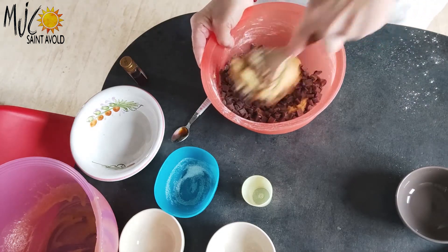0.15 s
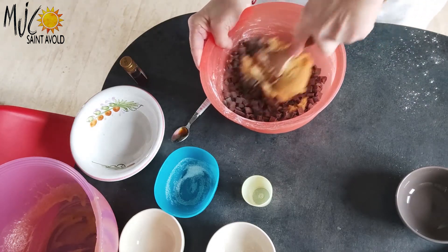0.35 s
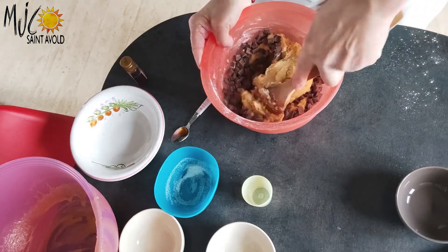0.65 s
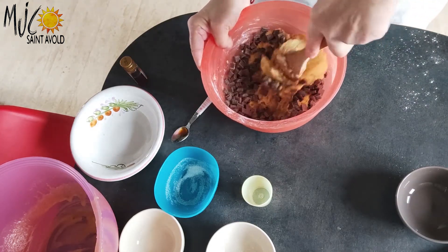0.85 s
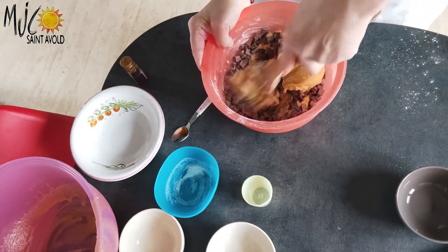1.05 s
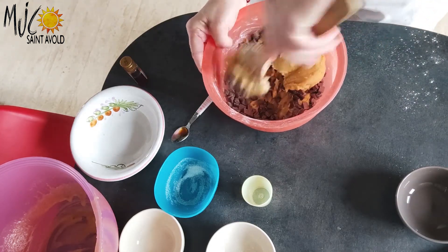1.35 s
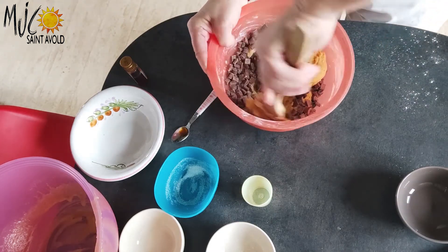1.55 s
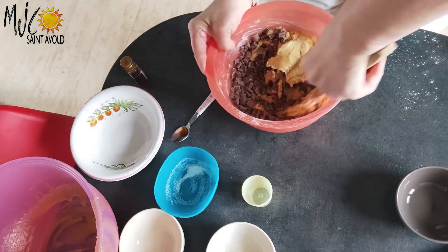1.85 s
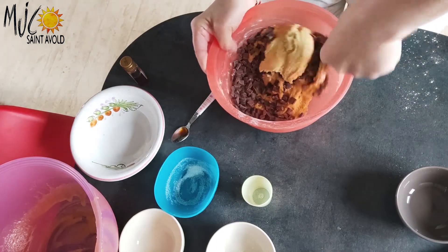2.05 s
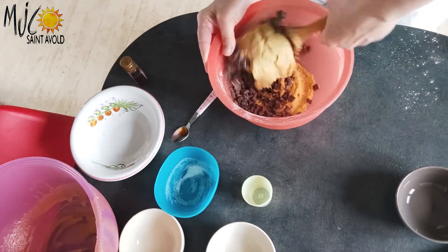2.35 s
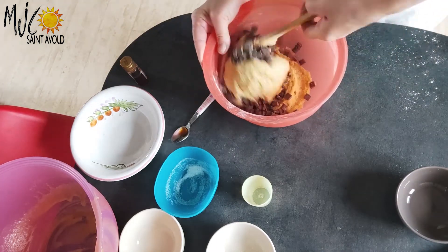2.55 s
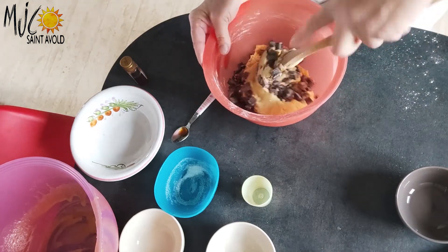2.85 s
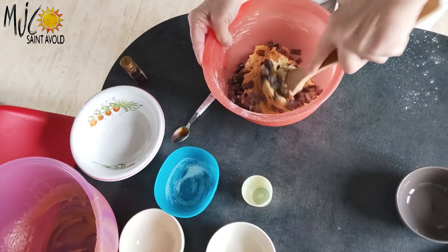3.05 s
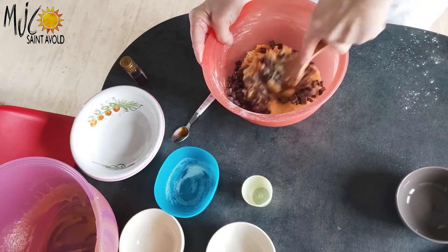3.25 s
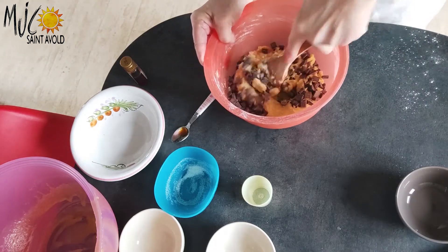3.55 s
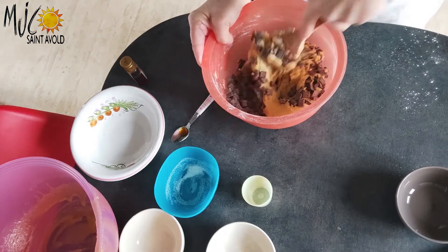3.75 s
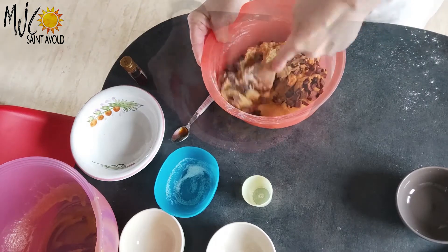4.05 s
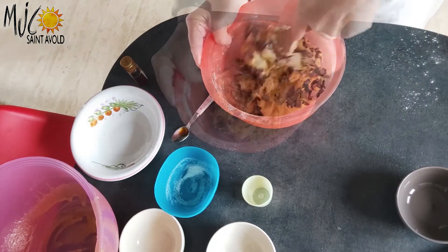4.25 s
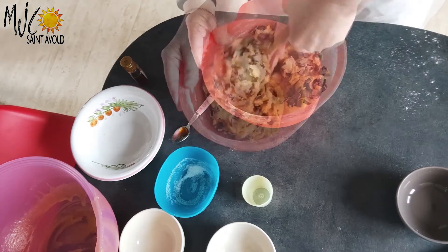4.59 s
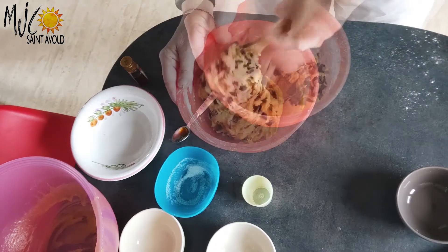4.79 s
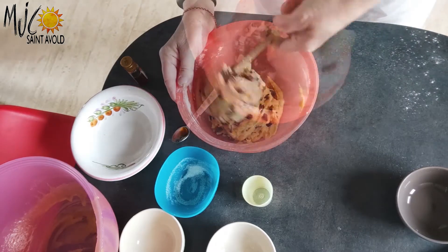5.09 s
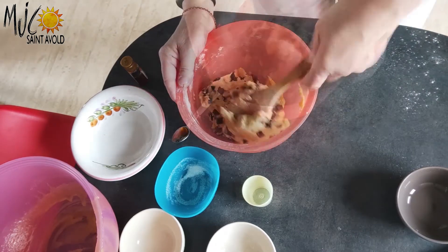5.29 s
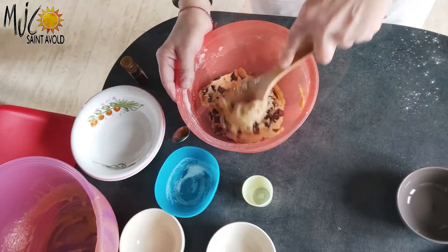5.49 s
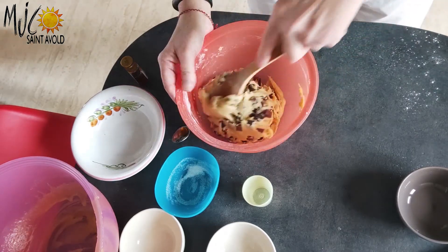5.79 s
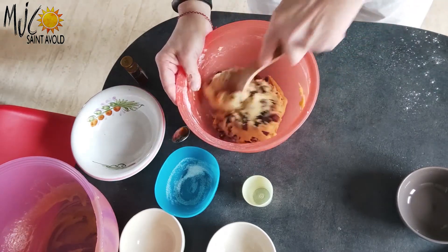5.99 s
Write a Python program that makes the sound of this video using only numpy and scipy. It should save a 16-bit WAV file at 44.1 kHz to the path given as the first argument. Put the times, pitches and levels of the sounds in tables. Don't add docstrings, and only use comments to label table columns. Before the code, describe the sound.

Loose chips spill and click against the wall of a plastic bowl while a spoon drags through heavy dough, heard close in stereo with a short kitchen echo. Bursts of snaps alternate with scraping sweeps and dull bowl thuds, the hardest knock past the middle. Then the chips suddenly vanish, leaving soft, sticky peeling, small pops and a couple of faint knocks over low hum and air.

```python
import sys
import numpy as np
from scipy import signal
from scipy.fft import rfft, irfft, next_fast_len
from scipy.io import wavfile

SR = 44100
rng = np.random.default_rng(int(sys.argv[2]) if len(sys.argv) > 2 else 0)


def attenuation_scalar(level_db):
    decades = np.asarray(level_db, float) / 20
    return 10 ** decades


def generate_wav(sig):
    pcm = np.round(np.clip(np.atleast_2d(sig).T, -1, 1) * 32767).astype(np.int16)
    wavfile.write(sys.argv[1], SR, pcm)


N = 270288
CHANGE_S = 4.733

# (time [s], rattle [dB], brightness [dB], body [dB], time to fade 20 dB [s])
SPILLS = [(0.0, -33.5, -6, -12.5, 0.14), (0.202, -39.5, -16.5, -14.5, .05), (0.685, -42, -0.5, -7, 0.19),
          (1.128, -36.5, 0, -6, 0.09), (1.485, -37, -3, -4.5, 0.11), (1.688, -41.5, -5, -15.5, 0.42),
          (2.309, -45, -3.5, -10, 0.8), (2.921, -44.5, -6, -9.5, 0.2), (2.988, -32, -16, -19, .17),
          (3.427, -52.5, 2, 14, 0.03), (3.477, -42, -7, -13, 0), (3.74, -50, -5.5, 0.5, 0.27),
          (3.987, -37, -3.5, -6, .22), (4.345, -40.5, -16, -6, .07), (4.476, -36, -2, -5.5, .3)]
# (peak time [s], rattle [dB], brightness [dB], body [dB], time to fade 20 dB [s])
SWEEPS = [(0.302, -46, 4.5, 2, .1), (0.469, -41, -6, -11.5, 0.25), (0.858, -50.5, -1, -4.5, 0.23),
          (1.3, -63, 9, 1, .5), (1.58, -49.5, 2, -8, 0.28), (1.84, -47.5, -4.5, -8.5, 0.27),
          (1.96, -49.5, 0.5, -2.5, 0.22), (2.07, -47, -1, 1, .15), (2.19, -57, 5, -7, 0.74),
          (2.4, -41, -3, -15, 0.41), (2.58, -51, -1, -1.5, 0.4), (2.74, -38, -6, -12.5, 0.1),
          (3.18, -49.5, -8.5, -6, 0.54), (3.598, -44, -2.5, -4, 0.15), (3.85, -67, 3.5, -4, 0.1),
          (4.14, -48, 9, -5, 0.06), (4.238, -38.5, -2, -8.5, 0.1), (4.65, -51.5, 0, -5, 0.23)]
# (peak time [s], rattle [dB], brightness [dB], body [dB], time to fade 20 dB [s])
PEELS = [(4.76, -63, -1.5, -5.5, 0.21), (4.87, -75, 10, -19, 0.074), (4.983, -71, 22, -4, 0.07),
         (5.282, -61.5, 10.5, -11, 0.22), (5.4, -64, 8.5, -4.5, 0.11), (5.48, -66, 12, -6, .07),
         (5.6, -87.5, 18, -4.5, 0.29), (5.7, -71, -7.5, -19, .06), (5.8, -99, 15, 2, .3),
         (5.955, -62, -3, -1.5, .1), (6.12, -76, 21.5, -5, 0.23)]
# (peak time [s], rumble [dB], upper modes [dB], time to fade 20 dB [s])
SHOVES = [(0.0, -58.5, 5.5, 0.32), (0.36, -48, -3, 0.15), (0.5, -57.5, 0.5, 0.4), (0.87, -57.5, 2, 0.25),
          (1.35, -67, 4.5, .3), (1.72, -58.5, 3.5, 0.36), (1.96, -59.5, 2.5, 0.44), (2.2, -70, 8, 0.95),
          (2.8, -65.5, 6.5, 0.43), (3.05, -60.5, 4.5, .35), (3.36, -59, 3, -0.05), (3.62, -53, 0.5, 0.19),
          (3.72, -63, -3, .1), (4.08, -45.5, -0.5, 0.12), (4.17, -51, 2, 0.13), (4.26, -56.5, 3, .12),
          (4.558, -45, 0, 0.11), (4.725, -51, -1, 0.04), (5.3, -74, 3, 0.2), (5.62, -73.5, 0, .4),
          (5.97, -72, 4, .3)]
# (time [s], rumble [dB], upper modes [dB], time to fade 20 dB [s])
JOLTS = [
    (0.3, -47.5, 3, 0.19),
    (0.705, -44.5, 1.9, 0.12),
    (1.136, -48.5, 1.3, 0.16),
    (2.436, -47.5, 1.3, 0.13),
    (3.428, -40.5, 7.6, 0.14),
    (3.851, -46, 2.6, 0.12),
    (4.343, -40.5, 1.9, .13),
    (4.812, -51.5, 0, .14),
    (5.848, -64, 9, .03),
]
# (time [s], peak [dB], treble [dB], shower [dB])
SNAPS = [(0.0094, -18.5, -11.5, -28), (0.0573, -20.5, -1.5, -26), (0.1411, -22, -11, -26),
         (0.2024, -23.5, -6.5, -23), (0.4015, -17.5, -10, -25), (0.4289, -21, -4.5, -36),
         (0.6833, -13, -10, -20), (0.7028, -16, -8.5, -28), (1.1273, -31, -3.5, -3), (1.1308, -21, -9, -24),
         (1.4815, -15, -9.5, -28), (1.4858, -17, -5, -18.5), (1.6886, -26, -17, -18.5),
         (2.362, -24.5, -21, -13), (2.4578, -18, -14, -24), (2.5042, -18.5, -10, -26.5),
         (2.574, -11, -11.5, -25), (2.6329, -13, -13.5, -35), (2.7038, -16.5, -9.5, -30),
         (2.7646, -16.5, -3.5, -28), (2.9208, -27, -8.5, -4.5), (2.9856, -17.5, -21, -24),
         (3.0026, -17, -10, -59), (3.475, -16.5, -8, -35), (3.9913, -17.5, -15, -40),
         (3.9968, -19, -10, -40), (4.4408, -19.5, -10, -31), (4.4757, -12, -7, -23.5),
         (4.6324, -17, -14.5, -24), (4.7157, -14, -16, -46)]
# (time [s], peak [dB], treble [dB])
TICKS = [(0.035, -27.5, -5), (0.2755, -31, 0.5), (0.2994, -27.5, -8), (0.4751, -20, -0.5),
         (0.4956, -28, 2.5), (0.6122, -31.5, -1.5), (1.0923, -30.5, -18), (1.12, -26.5, -2.5),
         (1.246, -28, -16), (1.3225, -39.5, 2), (1.779, -26, -12), (1.8407, -23.5, -22),
         (1.934, -31.5, -35.5), (2.3097, -32.5, -12), (2.4046, -27, -2), (2.513, -21.5, -15.5),
         (2.5348, -19.5, -9.5), (2.6196, -20.5, -17), (2.6792, -29, -25.5), (3.088, -19, -29),
         (3.149, -22.5, -11), (3.1729, -27.5, -9.5), (3.2008, -28, -8), (3.2202, -22.5, -6.5),
         (3.2608, -23, -17), (3.3532, -28.5, -10), (3.5639, -21.5, -12), (3.5866, -24, -8.5),
         (3.706, -38, -1.5), (3.7388, -24.5, -13.5),
         (0.395, -25, -7), (0.5543, -30.5, -26), (0.6045, -37, -1), (0.8579, -40, 6), (1.062, -45.5, 4),
        (1.3838, -41, -3), (2.3487, -36, -16), (2.723, -28, -4), (3.4073, -33, -13), (3.835, -40, 5),
        (3.93, -47.5, 1.5), (4.226, -29.5, -4), (3.8173, -27.5, -16), (4.011, -21.5, -6),
        (4.0505, -21.5, -4), (4.113, -28.5, 0), (4.2328, -22, -6.5), (4.506, -26.5, -10),
        (4.5212, -26, -12), (4.5496, -23, -14), (4.5814, -24, -5), (4.6922, -21, -2.5),
        (4.8679, -42.5, 5.5), (5.209, -65.5, -4.5), (5.7202, -55, 7), (5.785, -62, 9.5), (5.892, -60, 10),
        (5.95, -51.5, 2), (6.049, -53, 7.5)]
# (time [s], peak [dB], hardness [dB], table thud [dB])
KNOCKS = [(0.299, -34.5, -2, -31), (0.339, -30.5, -31, -22), (0.704, -33.5, -7.5, -14),
          (1.129, -41.5, 4, -18), (1.95, -45, 4, -14.5), (2.436, -40, -35, -27), (3.426, -19, -9.5, -28.5),
          (3.619, -45, -12.5, -23), (3.852, -45, -12, -5), (4.34, -25, -30, -24), (4.799, -44, -30, -14),
          (5.843, -55, -31, -18.5)]
# (frequency [Hz], width [Hz], level [dB])
BOWL_MODES = [(167, 28.3, -7), (227.8, 13.7, -3), (318, 29, -10.5), (360, 24.3, -6), (436, 45, -3.5),
              (503, 47, -7.5), (637, 55, -0.5), (795, 71, -4), (977, 66, -11), (1140, 74, -10.5)]
# (frequency [Hz], width [Hz], level [dB])
WALL_MODES = [(955, 220, 2), (1310, 126, 8), (1730, 220, 3), (2200, 250, -10)]
# (frequency [Hz], width [Hz])
TABLE_MODE = (69.4, 22.6)
# (frequency [Hz], density [dB per Hz])
CHIP_COLOUR = [(400, -25), (750, -15), (1200, -9), (1600, -13), (2100, -7.5), (2600, -4), (3200, -10),
               (4200, -15), (5900, -14.5), (7250, -4.5), (8900, -10), (9900, -32.5), (11500, -39),
               (15000, -42)]
# (frequency [Hz], density [dB per Hz])
AIR_COLOUR = [(25, -4), (40, -10.5), (70, -10.5), (200, -11.5), (500, -16.5), (1000, -25.5), (3000, -27),
              (5500, -33), (7300, -17.5), (8700, -20), (9900, -33.5), (12000, -31), (15000, -39)]
# (frequency [Hz], difference [dB])
PORT_DIFFERENCE = [(100, 5), (620, 5), (1350, 0.5), (2400, -0.5), (4300, -0.5), (5600, -8.5), (6600, -5),
                   (7400, -11), (8300, 5), (9500, 8), (12000, -1)]
# (frequency [Hz], time to fade 60 dB [s])
ROOM_T60 = [(100, 0.39), (1000, 0.33), (4000, 0.36), (9000, 0.23)]


def rms_one(x):
    return x / np.sqrt(np.mean(x ** 2) + 1e-20)


def at_hz(points, hz):
    table_hz, values = np.array(points).T
    return np.interp(np.log(hz + 1), np.log(table_hz), values)


def colour(x, points, share=1):
    size = next_fast_len(N + 8192)
    level_db = share * at_hz(points, np.fft.rfftfreq(size, 1 / SR))
    cepstrum = irfft(level_db * np.log(10) / 20, size)
    cepstrum = np.r_[cepstrum[0], 2 * cepstrum[1:size // 2]]
    return irfft(rfft(x, size) * np.exp(rfft(cepstrum, size)), size)[..., :N]


def drift(rate):
    r = np.exp(-80 * np.pi * rate / SR)
    slow = signal.lfilter([1], [1, -2 * r, r * r], rng.standard_normal(N // 40 + 2002))[2000:]
    return np.interp(np.arange(N) / 40, np.arange(len(slow)), rms_one(slow))


def ring(x, hz, width_hz):
    r, w = np.exp(-np.pi * width_hz / SR), 2 * np.pi * hz / SR
    return signal.lfilter([0, np.sin(w)], [1, -2 * r * np.cos(w), r * r], x + 1e-18)


def three_bands(x):
    low_hz, high_hz = 1850, 4500
    kinds = [(low_hz, "low"), ((low_hz, high_hz), "band"), (high_hz, "high")]
    return [signal.sosfilt(signal.butter(3, hz, kind, fs=SR, output="sos"), x) for hz, kind in kinds]


def grains(per_s, spread_db, clump_db):
    sizes = attenuation_scalar(spread_db * np.minimum(rng.exponential(1, N), 5)) * rng.choice([-1, 1], N)
    struck = rng.random(N) < per_s * attenuation_scalar(clump_db * drift(25)) / SR
    return rms_one(sizes * struck)


def swells(s, db, rise_s, fade_s):
    age = np.arange(0, N + 32, 32) / SR - s[:, None]
    shape_db = -20 * np.maximum(age / fade_s[:, None], -age / rise_s[:, None])
    power = np.sum(attenuation_scalar(2 * (db[:, None] + shape_db)), axis=0)
    return np.interp(np.arange(N) / 32, np.arange(len(power)), 10 * np.log10(power + 1e-14))


def stirring():
    s, db, bright_db, body_db, fade_s = np.transpose(SPILLS + SWEEPS + PEELS)
    is_spill = np.arange(len(s)) < len(SPILLS)
    rise_s = np.where(is_spill, 0.011, 0.79 * fade_s)
    loose, before = s < CHANGE_S, np.arange(N) < CHANGE_S * SR
    levels = []
    for extra_db, lingers in [(body_db, 0.81), (0, 1), (bright_db, 1.14)]:
        chips, dough = [swells(s[k], (db + extra_db)[k], rise_s[k], lingers * fade_s[k])
                        for k in (loose, ~loose)]
        levels.append(np.where(before, chips, dough))
    return levels


def rattle():
    levels_db = stirring()
    loose = grains(per_s=1100, spread_db=3.0, clump_db=4.5)
    sticky = grains(per_s=6500, spread_db=2.0, clump_db=1.5)
    contacts = np.where(np.arange(N) < CHANGE_S * SR, loose, sticky)
    bands = three_bands(colour(contacts, CHIP_COLOUR))
    return sum(attenuation_scalar(db - 3.5) * rms_one(band) for band, db in zip(bands, levels_db))


def shoving():
    s, db, upper_db, fade_s = np.transpose(JOLTS + SHOVES)
    is_jolt = np.arange(len(s)) < len(JOLTS)
    rise_s = np.where(is_jolt, 0.01, 0.68 * fade_s)
    rumble_db = swells(s, db, rise_s, fade_s)
    upper_modes_db = swells(s, db + upper_db, rise_s, fade_s)
    table_db = swells(s, db - 9, rise_s, 1.3 * fade_s)
    return rumble_db, upper_modes_db - rumble_db, table_db - rumble_db


def drag():
    rumble_db, upper_db, table_db = shoving()
    slips = grains(per_s=370, spread_db=1.5, clump_db=3.5)
    modes = [attenuation_scalar(db) * ring(slips, hz, 1.04 * width_hz) * (-1) ** k
             for k, (hz, width_hz, db) in enumerate(BOWL_MODES)]
    table = ring(slips, *TABLE_MODE) - 1.37 * ring(slips, 141, 30)
    rumble, upper = rms_one(sum(modes[:2])), rms_one(sum(modes[2:]))
    return attenuation_scalar(rumble_db - 2) * (rumble + attenuation_scalar(upper_db) * upper + attenuation_scalar(table_db) * rms_one(table))


def air():
    shared, own = rng.standard_normal(N), rng.standard_normal((2, N))
    hum_hz, hum_db, air_db = 48.8, -64.5, -65
    hum = attenuation_scalar(hum_db + 1.3 * drift(3.3)) * np.sin(2 * np.pi * hum_hz * np.arange(N) / SR)
    return attenuation_scalar(air_db) * rms_one(colour(0.5 * shared + own, AIR_COLOUR)) + hum


def snaps():
    age = np.arange(2600) / SR
    tick_shower_db = -30
    rows = SNAPS + [(*row, tick_shower_db) for row in TICKS]
    luck = rng.standard_normal((len(rows), 2, len(age)))
    bodies_db = -11 + 4.5 * luck[:, 0, -1]
    cracks = luck[:, 0] * 0.27 * np.exp(-age / 0.00069)
    cracks[:, 0] = np.sign(cracks[:, 0])
    showers = luck[:, 1] ** 3 / 4 * np.exp(-age / 0.0075)
    trains = np.zeros((3, N + len(age)))
    for crack, shower, body_db, (s, db, treble_db, shower_db) in zip(cracks, showers, bodies_db, rows):
        dull_body_db = body_db - 0.2 * (treble_db + 10)
        gains = attenuation_scalar(db + np.array([dull_body_db, 0, treble_db + 4.0]))
        start = round(s * SR)
        trains[:, start:start + len(age)] += gains[:, None] * (crack + attenuation_scalar(shower_db) * shower)
    coloured = colour(trains[:, :N], CHIP_COLOUR)
    return attenuation_scalar(22) * sum(three_bands(train)[k] for k, train in enumerate(coloured))


def knocks():
    s, db, hard_db, thud_db = np.transpose(KNOCKS)
    luck = rng.standard_normal((len(s), len(BOWL_MODES) + len(WALL_MODES)))
    bowl = [(mode, -7.5, 0.0015) for mode in BOWL_MODES]
    wall = [(mode, hard_db - 3, 0) for mode in WALL_MODES]
    out = np.zeros(N)
    for k, ((hz, width_hz, mode_db), extra_db, late_s) in enumerate(bowl + wall):
        clicks = np.zeros(N)
        clicks[((s + late_s) * SR).astype(int)] = attenuation_scalar(db + mode_db + extra_db + 3.1 * luck[:, k]) * (-1) ** k
        bounce = np.roll(clicks, int((0.0081 + 0.00124 * k) * SR))
        out += ring(clicks + attenuation_scalar(-6.5) * bounce * (late_s > 0), hz, width_hz)
    thuds = np.zeros(N)
    thuds[((s + 0.012) * SR).astype(int)] = attenuation_scalar(db + thud_db + 3.5)
    return out + ring(thuds, *TABLE_MODE)


def response(t60_scale, seconds):
    size = int(seconds * SR)
    spectrum = rfft(rng.standard_normal((2, size)))
    hz, out = np.fft.rfftfreq(size, 1 / SR), 0
    for low in 20 * 2. ** np.arange(10):
        t60 = t60_scale * at_hz(ROOM_T60, 1.2 * low)
        decay = attenuation_scalar(-60 * np.arange(size) / SR / t60)
        out = out + decay * irfft(spectrum * (hz >= low) * (hz < 2 * low), size)
    return rms_one(out) / np.sqrt(size)


def through(x, tail):
    before = np.arange(N) < CHANGE_S * SR
    chips, dough = [signal.oaconvolve(np.atleast_2d(x) * part, tail, axes=1)[:, :N]
                    for part in (before, ~before)]
    return chips * before + dough


def placed(x, near_db):
    places = 12
    place = np.repeat(rng.integers(0, places, N // 256 + 1), 256)[:N]
    echoes = sum(through(x * (place == k), response(0.033, 0.03)) for k in range(places))
    return x + attenuation_scalar(near_db) * echoes


def scene():
    tumble, cracks, bowl = rattle(), snaps(), knocks() + drag()
    kitchen = np.pad(response(0.99, 0.6), ((0, 0), (int(0.005 * SR), 0)))
    near = placed(tumble, near_db=2.0) + placed(cracks, near_db=-1.5) + bowl
    far = through(attenuation_scalar(-0.5) * tumble + attenuation_scalar(-0.5) * cracks + attenuation_scalar(-11.5) * bowl, kitchen)
    return near + far + air()


def top_cut(x):
    return signal.sosfilt(signal.butter(12, 15400, fs=SR, output="sos"), x)


def record(dry):
    left = colour(dry[0], PORT_DIFFERENCE, 0.5)
    right = colour(dry[1], PORT_DIFFERENCE, -0.5)
    return top_cut(np.array([left, right]))


dry = scene()
out = record(dry)
generate_wav(out)
```